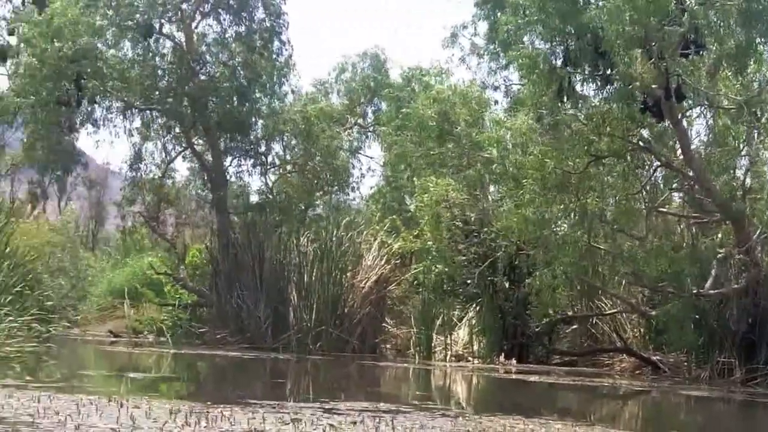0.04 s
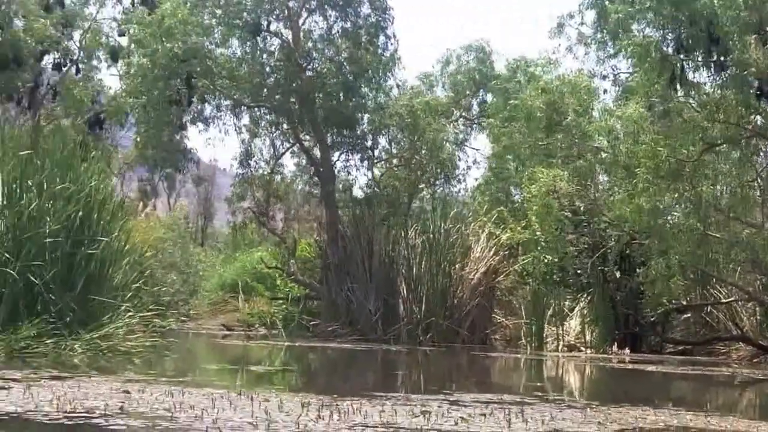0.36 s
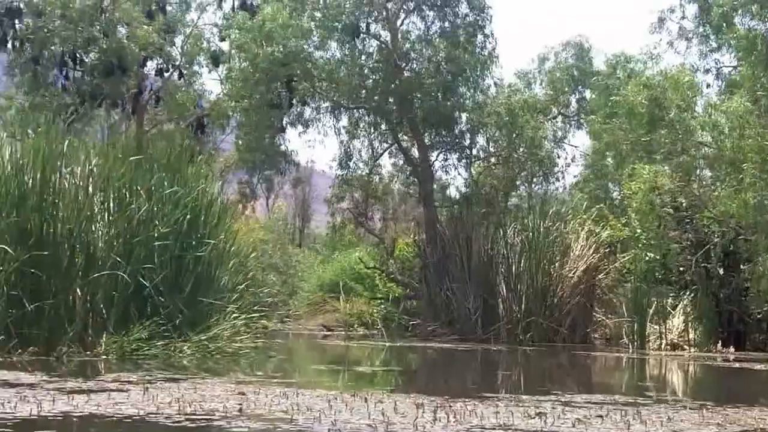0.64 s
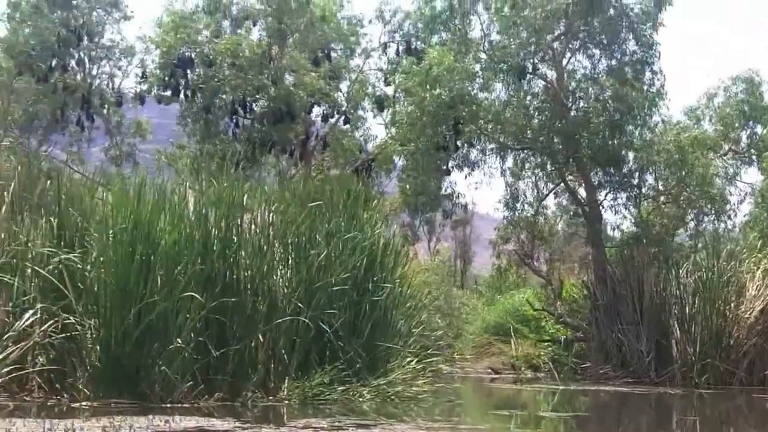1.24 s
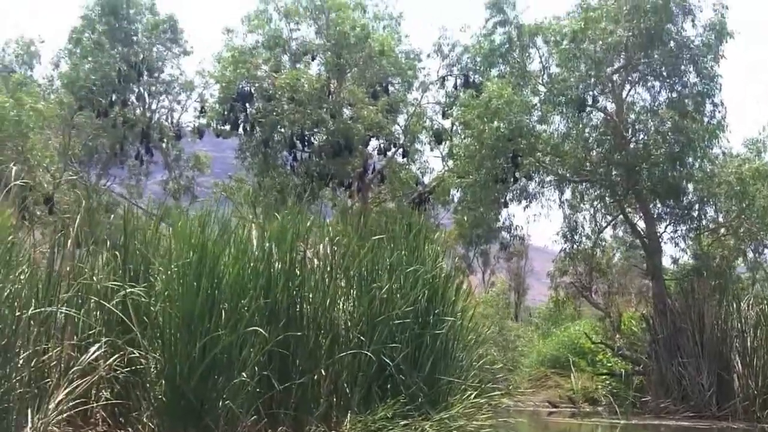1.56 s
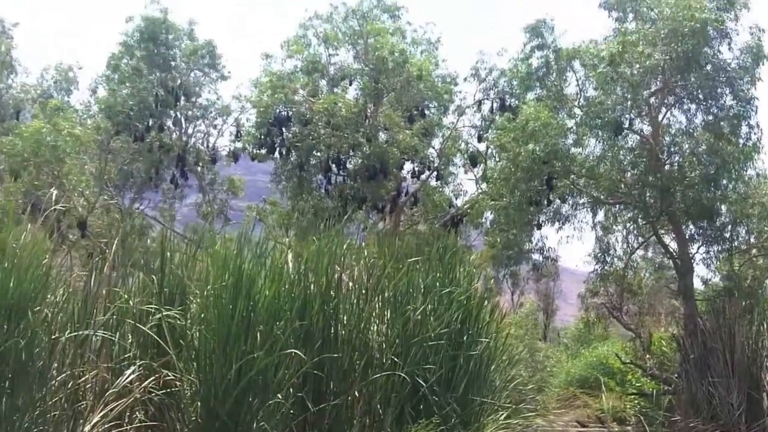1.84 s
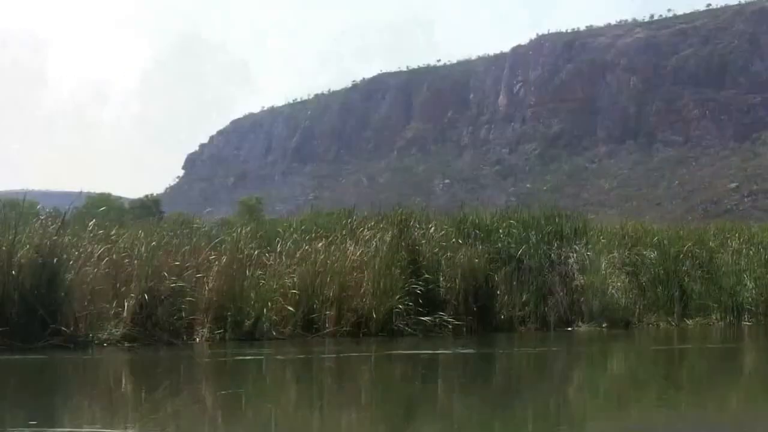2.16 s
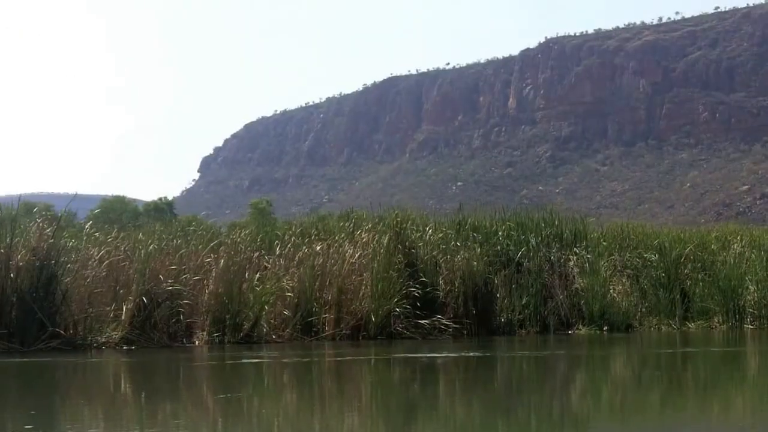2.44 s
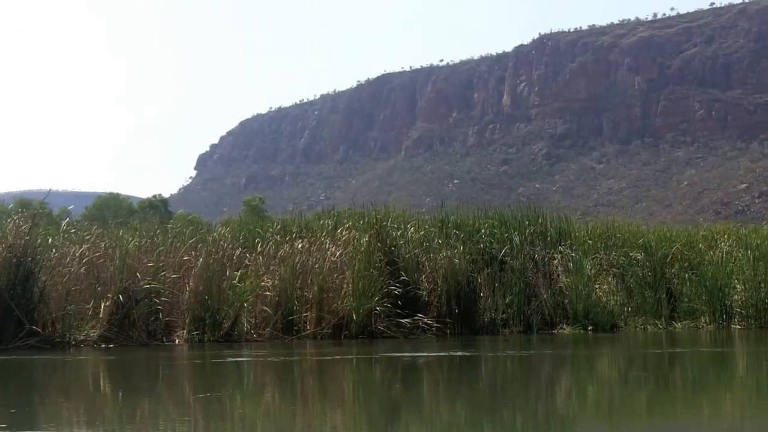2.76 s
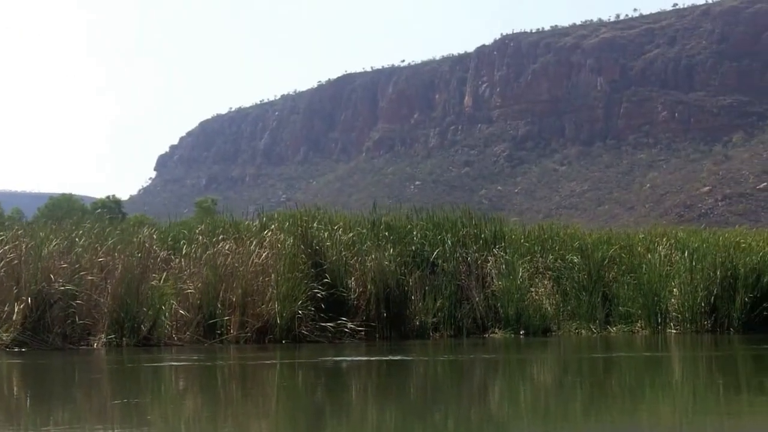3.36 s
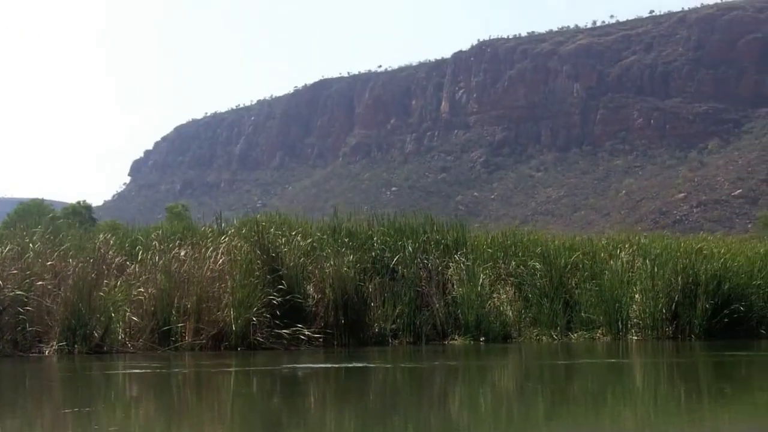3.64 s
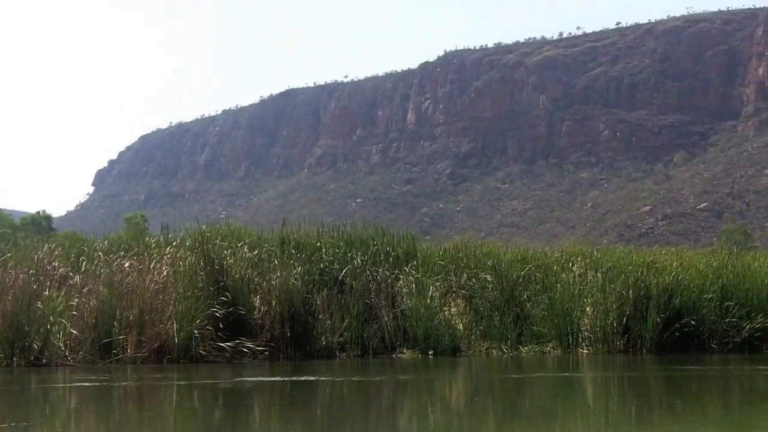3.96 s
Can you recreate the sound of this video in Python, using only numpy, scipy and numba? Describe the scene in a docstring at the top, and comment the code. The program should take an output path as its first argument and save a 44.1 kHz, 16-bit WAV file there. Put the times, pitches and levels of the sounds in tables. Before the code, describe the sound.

Harsh bat screeches and rasping calls outdoors, with gusts buffeting the microphone.

```python
"""Flying foxes squeal, screech and rasp in riverside trees while wind buffets the microphone.
Their squeals are harmonic tones; screech and rasps are larynx pulses filtered by throat resonances.
Midway the sound fades out and returns on a reed bank, where small birds chirp and an insect throbs.
Faint hiss, a few twig ticks and the thin whine of a camera motor lie under both scenes,
and the camera cuts a narrow notch in the treble."""
import sys
import numpy as np
from scipy import signal
from scipy.fft import rfft, irfft
from scipy.io import wavfile
from scipy.ndimage import uniform_filter1d
from numba import njit

SR = 44100
rng = np.random.default_rng(int(sys.argv[2]) if len(sys.argv) > 2 else 0)


def file_out(sig):
    """Save sig as 16-bit WAV at sys.argv[1]."""
    # one column per channel
    cols = np.atleast_2d(sig).T
    # limit, then scale
    lim = np.clip(cols, -1, 1)
    pcm = np.round(lim * 32767).astype(np.int16)
    wavfile.write(sys.argv[1], SR, pcm)


N = 176400
FADE_S = (1.99, 2.404, 2.41, 2.499)  # fade-out starts, ends; fade-in starts, ends
SIDE = np.array([[1], [-1]])  # opposite polarity in the left and right channels


def undb(db):
    """Amplitude ratio of a level in decibels."""
    return 10 ** (np.asarray(db) / 20)


def unit(x):
    """Normalisation to rms 1."""
    return x / np.sqrt(np.mean(x ** 2) + 1e-30)


def clock():
    """Time of every sample in seconds."""
    return np.arange(N) / SR


def curve(rows):
    """Linear interpolation of each later column over the times in the first."""
    rows = np.array(rows, float)
    return [np.interp(clock(), rows[:, 0], column) for column in rows.T[1:]]


def walk(rate_hz):
    """Random modulation of rms 1: straight lines between random values."""
    step = max(int(SR / rate_hz), 1)
    held = np.repeat(rng.standard_normal(N // step + 1), step)
    return unit(uniform_filter1d(held, step)[:N])


def arch(u):
    """Half-sine envelope over u = 0..1."""
    return np.sqrt(2) * np.sin(np.pi * np.clip(u, 0, 1))


def noise(colour):
    """Spectral shaping: noise of rms 1 that follows (Hz, dB) points and is cut off beyond them."""
    hz, db = np.array(colour, float).T
    bins_hz = np.maximum(np.arange(N // 2 + 1) * SR / N, 1)
    gain = undb(np.interp(np.log(bins_hz), np.log(hz), db, -200, -200))
    return unit(irfft(rfft(rng.standard_normal(N)) * gain, N))


@njit
def svf(x, hz, width_hz):
    """Two-pole state-variable band-pass with a moving centre."""
    y, band, low = np.empty(len(x)), 0., 0.
    for i in range(len(x)):
        g, damping = np.tan(np.pi * hz[i] / SR), width_hz / hz[i]
        v = (band + g * (x[i] + 1e-18 - low)) / (1 + g * (g + damping))
        band, low = 2 * v - band, low + 2 * g * v
        y[i] = damping * v
    return y


def resonate(x, hz, width_hz):
    """Four-pole resonance from two band-passes in cascade, output rms 1."""
    hz = np.minimum(hz + np.zeros(len(x)), SR * .45)
    return unit(svf(svf(x, hz, float(width_hz)), hz, float(width_hz)))


def air(colour, db):
    """Broadband hiss of distant reeds and leaves; a weak difference signal widens it, most at the top."""
    side = undb(db - 19.5) * noise(colour)
    side += undb(-86.5) * resonate(rng.standard_normal(N), hz=10650, width_hz=3000)
    mid = undb(db + walk(5.32)) * noise(colour)
    return mid + side * SIDE


def whine():
    """Line spectrum of the camera motor: all partials waver together with its speed."""
    # Each row: frequency in Hz, level in dB.
    partials = [(6623, -78.5), (7163, -83.5), (7865, -104), (9020, -87.5), (12678, -89), (12708, -86)]
    motor_time = np.cumsum(1 + .00045 * walk(26)) / SR
    return sum(np.sqrt(2) * undb(db + .79 * walk(22)) * np.sin(2 * np.pi * hz * motor_time)
               for hz, db in partials)


def eddies(colour):
    """Turbulence of even strength: noise divided by its running rms."""
    x = noise(colour)
    return x / np.sqrt(uniform_filter1d(x ** 2, int(.14 * SR)) + .02)


def wind(gust_db=-34, knee_db=-19.5, growth=2.39):
    """Turbulent pressure on the microphone: fast eddies outgrow the rumble, so gusts sound brighter."""
    # Strength of the rumble. Each row: time in seconds, level in dB.
    strength = [(0.0, -12.5), (0.17, -31), (0.2, -19), (0.3, -21.5), (0.38, -27), (0.45, -18.5),
                (0.56, -30), (0.59, -23), (0.8, -25.5), (0.87, -32), (0.91, -24), (0.94, -27.5),
                (1.09, -27), (1.32, -31.5), (1.38, -28.5), (1.72, -27), (1.92, -28.5), (2.03, -35),
                (2.19, -35.5), (2.26, -28.5), (2.35, -25.5), (2.48, -28.5), (2.57, -25), (2.61, -32),
                (2.69, -22), (2.8, -30), (3.0, -36), (3.07, -33.5), (3.12, -31), (3.27, -34.5),
                (3.34, -30.5), (3.46, -26.5), (3.54, -29), (3.59, -33), (3.62, -18.5), (3.75, -28.5),
                (3.84, -32), (4.0, -27.5)]
    # Spectra of the slow and the fast eddies. Each row: frequency in Hz, relative level in dB.
    rumble_colour = [(10, 15), (25, -2), (45, -2.5), (65, -13.5), (100, -23), (140, -35.5), (200, -41.5),
                     (300, -49), (500, -57.5), (900, -77.5)]
    gust_colour = [(55, -12), (90, 5.5), (135, -3), (200, -14), (320, -32.5), (600, -41), (1500, -57)]
    # Sudden pushes of pressure. Each row: time in seconds, width in seconds, peak in dB.
    buffets = [(0.048, 0.0021, -18.5), (0.142, 0.0017, -19.5), (0.214, 0.0027, -20.5), (0.253, 0.0043, -10),
               (0.348, 0.0014, -18.5), (0.442, 0.0022, -10), (0.649, 0.002, -21.5), (0.905, 0.0021, -19.5),
               (2.264, 0.0041, -11.5), (2.693, 0.01, -31), (3.066, 0.0021, -18.5), (3.402, 0.0019, -27.5),
               (3.475, .0016, -27), (3.614, 0.0021, -11.5), (3.633, 0.003, -10.5), (3.704, 0.0017, -17.5)]
    db = curve(strength)[0]
    rumble = undb(db) * (eddies(rumble_colour) + undb(-39) * noise(rumble_colour) * SIDE)
    gusts = undb(gust_db + growth * (db - knee_db)) * eddies(gust_colour)
    pushes = sum(undb(peak) * np.exp(1 - np.hypot((clock() - at) / width, 1))
                 for at, width, peak in buffets)
    return rumble + gusts + pushes


def ticks():
    """Transients of nearby twigs: bursts of band-limited noise a few milliseconds long."""
    # Each row: start in seconds, length in seconds, level in dB, centre in Hz, bandwidth in Hz.
    twigs = [(.441, .003, -49.5, 700, 1500), (.243, .009, -57, 500, 300), (.843, .008, -58, 500, 450),
             (1.032, .006, -61.5, 1250, 700), (1.032, .005, -65, 2700, 1800),
             (3.800, .014, -58.5, 950, 450), (3.850, .003, -57, 1300, 1300), (3.850, .003, -63, 5500, 5000)]
    return sum(undb(db) * arch((clock() - start) / length) * resonate(rng.standard_normal(N), hz, width)
               for start, length, db, hz, width in twigs)


def scuff(start_s=2.626, length_s=.048, db=-54.5):
    """One dull scuff close by: fast random amplitude modulation makes its noise grainy."""
    # Spectrum of the scuff. Each row: frequency in Hz, relative level in dB.
    colour = [(250, -14), (480, 2), (1000, -1), (1400, -7), (1900, -17), (3000, -32), (7000, -27),
              (12000, -40)]
    return undb(db + 2 * walk(450)) * arch((clock() - start_s) / length_s) * noise(colour)


def insect(pulse_s=.06):
    """Amplitude modulation of a shrill noise band: an insect throbs about eleven times a second."""
    # Each row: centre of the pulse in seconds, level in dB.
    pulses = [(2.55, -79), (2.645, -78), (2.74, -76), (2.83, -81), (2.925, -78), (3.01, -77), (3.10, -76),
              (3.19, -73), (3.28, -71), (3.375, -75), (3.465, -73), (3.56, -79), (3.655, -77), (3.735, -79),
              (3.82, -76), (3.89, -77), (3.975, -77)]
    throb = sum(undb(db) * arch((clock() - at) / pulse_s + .5) for at, db in pulses)
    return throb * resonate(rng.standard_normal(N), hz=7180, width_hz=380)


def whistle(start, length, pitches_hz, harmonics_db, waver=.016):
    """Frequency modulation: a harmonic tone wavers about a parabola through three pitches."""
    out, onset, size = np.zeros(N), int(max(start, 0) * SR), int(length * SR)
    u = np.arange(size) / size
    glide_hz = np.polyval(np.polyfit([0, .5, 1], pitches_hz, 2), u)
    phase = 2 * np.pi * np.cumsum(glide_hz * (1 + waver * walk(900)[:size])) / SR
    tone = sum(np.sqrt(2) * undb(db) * np.sin(k * phase) for k, db in enumerate(harmonics_db, 1))
    out[onset:onset + size] = arch(u) * tone
    return out


def birds():
    """Gliding sine chirps, buzzy where deep pitch modulation spreads sidebands, and one far rising cry."""
    # Each row: start and length in seconds, level in dB, first, middle and last pitch in Hz,
    # waver as a fraction of the pitch.
    chirps = [(2.725, .042, -68.5, 2050, 2120, 1950, .07), (2.84, .135, -77, 2170, 2150, 2130, .035),
              (3.052, .034, -72, 4500, 4770, 4800, .006), (3.080, .019, -67, 4800, 5100, 5620, .006),
              (3.24, .06, -75, 2300, 2550, 2250, .13), (3.670, .052, -64.5, 3120, 2880, 2580, .085)]
    cry = whistle(start=2.70, length=.04, pitches_hz=(1540, 1750, 2080), harmonics_db=(-74, -79, -78))
    return cry + sum(whistle(start, length, pitches, (db,), waver)
                     for start, length, db, *pitches, waver in chirps)


def trees(x, db=-12, t60_s=.6, delay_s=.0044):
    """Reverberation: trunks and leaves scatter the sound into an exponentially decaying tail."""
    t = clock()[:SR]
    tails = rng.standard_normal((2, SR)) * undb(-60 * t / t60_s) * (t > delay_s)
    mid, side = (signal.fftconvolve(x, tail / np.linalg.norm(tail))[:N] for tail in tails)
    return undb(db) * (mid + undb(-26) * side * SIDE)


def larynx(rate_hz, size, jitter=.15, shimmer_db=2.2, puff_periods=.8):
    """Glottal source: pulses uneven in period and strength, each followed by a decaying puff of noise."""
    timing, strength = rng.standard_normal((3000, 2)).T
    periods = np.exp(jitter * timing) * SR / rate_hz
    onsets = np.append(0, np.cumsum(periods))[:-1].astype(int)
    inside = onsets < size
    pulses = np.zeros(size)
    pulses[onsets[inside]] = undb(shimmer_db * strength[inside])
    phase = np.interp(np.arange(size), onsets, np.arange(len(onsets))) % 1
    puffs = np.exp(-phase / puff_periods) * rng.standard_normal(size)
    return unit(pulses), unit(puffs)


def blend(pulses, puffs, rough):
    """Equal-power mix: rough is the share of the power in the puffs."""
    return np.sqrt(1 - rough) * pulses + np.sqrt(rough) * puffs


def throat(x, hz, width_hz):
    """A formant: an eight-pole resonance whose steep sides round each pulse."""
    return resonate(resonate(x, hz, width_hz), hz, width_hz)


def squeals():
    """Periodic voicing: short flying fox cries of three harmonics."""
    # Each row: start and length in seconds, level of the fundamental in dB, first, middle and last
    # pitch in Hz, second and third harmonic in dB relative to the fundamental.
    cries = [(.008, 0.04, -65, 1100, 1110, 1150, -11, -22), (0.04, .032, -58.5, 1150, 1280, 1130, -14, -28),
             (0.076, 0.037, -56, 1140, 1245, 1090, -7, -29),
             (0.094, 0.0295, -63, 2790, 2610, 2480, 4, -2.5),
             (0.182, 0.031, -65, 1210, 1357, 1190, -26, -34),
             (2.048, 0.079, -67.5, 1186, 1243, 1080, -18, -22),
             (2.14, .030, -69, 1500, 1750, 2050, -12, -10)]
    return sum(whistle(start, length, pitches, (db, db + second, db + third))
               for start, length, db, *pitches, second, third in cries)


def rasps():
    """Slow pulses ring the formants one by one; under strain the high one yields to breathy treble."""
    # Each row: start, attack, length and release time constant in seconds, level in dB, pulses per
    # second, low formant and its width in Hz, high formant in Hz, high and top formant in dB
    # relative to the low one, strain in dB per second.
    calls = [(.032, .004, 0.027, 0.011, -68, 340, 2300, 650, 5650, 3, 3, 0),
             (0.109, .003, .011, 0.003, -50.5, 420, 2400, 1100, 5250, -2.5, -4, 0),
             (0.132, .004, .03, 0.005, -66, 300, 2380, 500, 5700, 0, 0, 0),
             (0.47, .01, .01, 0.08, -69, 130, 2400, 420, 6300, -6, -8, 0),
             (1.864, .005, .045, .006, -48.5, 145, 2215, 380, 5170, -6.5, -19, 210),
             (1.929, .001, .1, .02, -65, 75, 2170, 440, 5300, -10, -13, 0),
             (2.051, .003, 0.1, 0.017, -71, 110, 2130, 450, 5700, -4, -11, 0),
             (2.152, .028, .105, 0.2, -52, 125, 2060, 220, 6040, -1.5, -16, 0)]
    out, size = np.zeros(N), SR // 2
    t = np.arange(size) / SR
    for (start, attack, length, release, db, rate,
         low_hz, low_width, high_hz, high_db, top_db, strain) in calls:
        pulses, puffs = larynx(rate, size)
        strain_db = strain * np.minimum(t, length)
        low = throat(blend(pulses, puffs, rough=.2), low_hz, low_width)
        high = throat(blend(pulses, puffs, rough=.72), high_hz, width_hz=880)
        top = throat(puffs, hz=7700, width_hz=3300)
        breath = undb(-20) * resonate(puffs, hz=3800, width_hz=600)
        voice = low + undb(high_db - strain_db) * (high + breath) + undb(top_db + strain_db) * top
        envelope = np.minimum(t / attack, 1) * np.exp(-np.maximum(t - length, 0) / release)
        onset = int(start * SR)
        out[onset:onset + size] += undb(db) * voice * envelope
    return out


def screech(pulse_hz=530, flutter_hz=105, flutter_depth=.16, edge_s=.0036):
    """Source and filter: fast irregular pulses flutter through three wandering throat formants."""
    # Course of the long screech. Each row: time in seconds, level in dB, relative gain of the
    # low formant in dB, low and high formant in Hz.
    course = [(0.162, -67, -1, 2380, 6300), (0.177, -53.5, -5, 2370, 6070), (0.215, -54, -3, 2340, 6560),
              (0.243, -57.5, -3, 2390, 6330), (0.31, -50, -7.5, 2460, 6580), (0.36, -53.5, -3, 2420, 6370),
              (0.435, -57, -0.5, 2480, 6200), (0.46, -65, -1, 2480, 6500)]
    t = clock()
    db, low_db, low_hz, high_hz = curve(course)
    flutter_phase = 2 * np.pi * np.cumsum(flutter_hz * (1 + .1 * walk(89.4))) / SR
    source = blend(*larynx(pulse_hz, N), rough=.45) * (1 + flutter_depth * np.sin(flutter_phase))
    mouth = 1 + .015 * walk(50.4)  # shifts the three formants together
    voice = (undb(low_db) * throat(source, low_hz * mouth, width_hz=520)
             + undb(-2.5) * throat(source, high_hz * mouth, width_hz=1400)
             + undb(-5) * throat(source, 7700 * mouth, width_hz=2100)
             + undb(-21.5) * resonate(source, hz=10600, width_hz=2500))
    gate = np.clip(np.minimum(t - course[0][0], course[-1][0] - t) / edge_s, 0, 1)
    return voice * undb(db) * gate


def scene(balance_db=.2):
    """Superposition: first the roost, then the reed bank, with ticks, wind and whine in both."""
    # Spectra of the hiss in the trees and by the reeds. Each row: frequency in Hz, relative level in dB.
    leaf_hiss = [(120, -26), (200, -3.5), (338, -8), (370, -9), (570, -11), (928, -16), (1280, -17.5),
                 (1600, -19.5), (2420, -22), (3800, -32.5), (4160, -36), (4630, -29.5), (6300, -24.5),
                 (6890, -20), (7540, -25), (9200, -28.5), (10100, -32.5), (12700, -30.5), (15000, -38.5)]
    reed_hiss = [(150, -11), (250, -1.5), (496, -5.5), (630, -6), (1730, -15.5), (2090, -16.5),
                 (2520, -17.5), (3210, -22.5), (4220, -32), (4670, -24.5), (6250, -22), (7170, -16.5),
                 (8230, -24), (12400, -26.5), (15000, -26)]
    bats = screech() + rasps() + squeals()
    roost = bats + trees(bats) + air(leaf_hiss, db=-61.5)
    reeds = birds() + insect() + scuff() + air(reed_hiss, db=-64)
    outdoors = np.where(clock() < FADE_S[1], roost, reeds) + ticks()
    return outdoors * undb(SIDE * balance_db / 2) + wind() + whine()


def record(dry, notch_hz=4310, notch_width_hz=202, notch_db=-10.5, edge_s=.008, top_hz=15100):
    """Filtering and gain: a treble notch, a fade out and in, softened ends and a steep low-pass."""
    hz = np.linspace(0, SR / 2, 513)
    response = undb(notch_db * np.exp(-((hz - notch_hz) / notch_width_hz) ** 2))
    notch = signal.firwin2(511, hz, response, fs=SR)
    notched = signal.fftconvolve(dry, notch[None], "same", axes=1)
    fade = np.interp(clock(), FADE_S, (1, 0, 0, 1))
    edges = np.clip(np.minimum(clock(), N / SR - clock()) / edge_s, 0, 1) ** 2
    low_pass = signal.ellip(8, .2, 70, top_hz, fs=SR, output="sos")
    return signal.sosfilt(low_pass, notched * fade * edges)


dry = scene()
out = record(dry)
file_out(out)
```